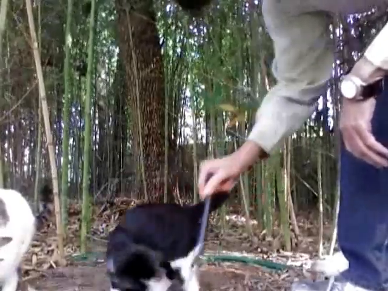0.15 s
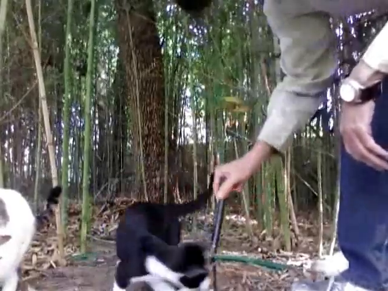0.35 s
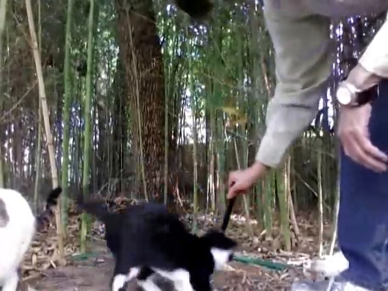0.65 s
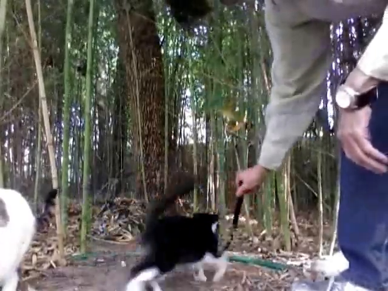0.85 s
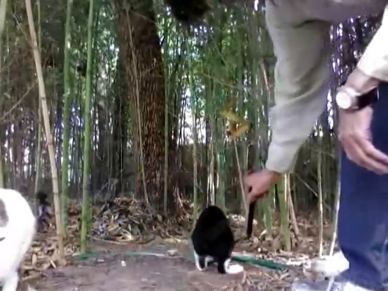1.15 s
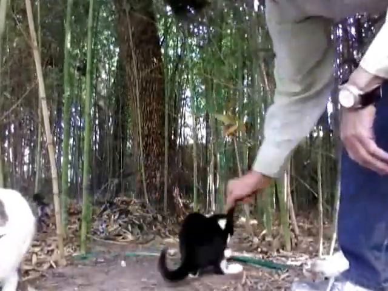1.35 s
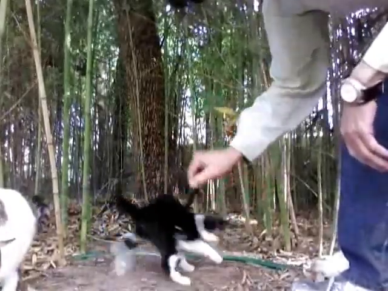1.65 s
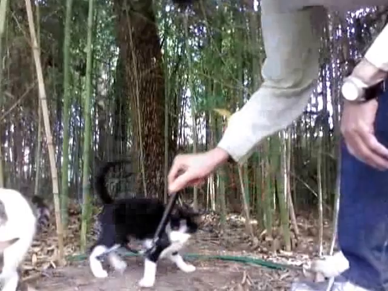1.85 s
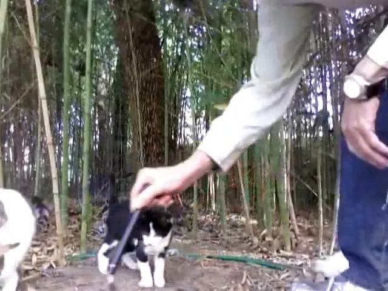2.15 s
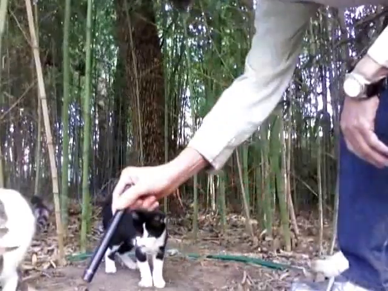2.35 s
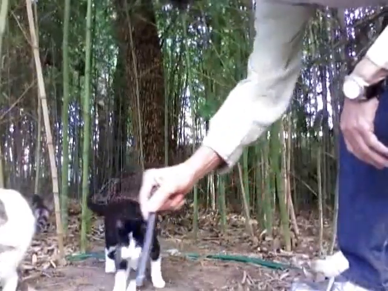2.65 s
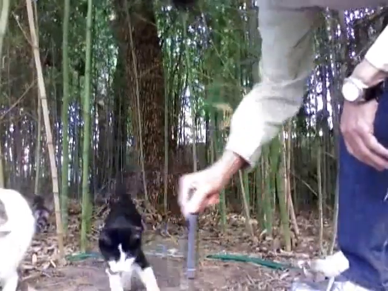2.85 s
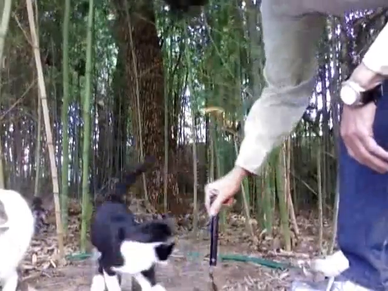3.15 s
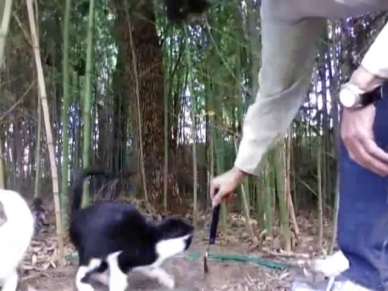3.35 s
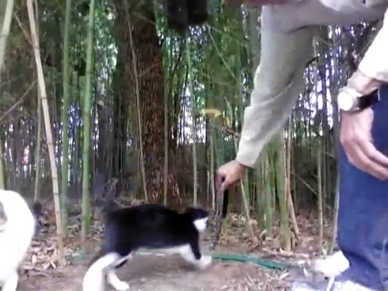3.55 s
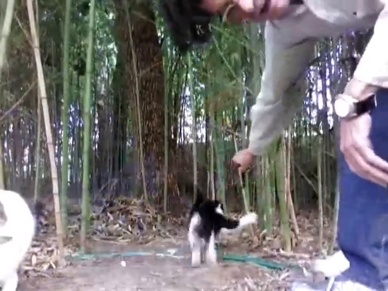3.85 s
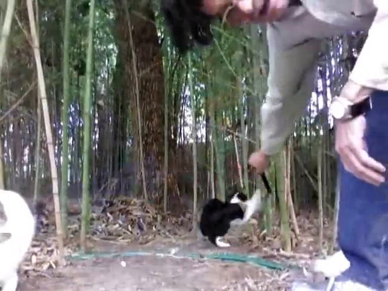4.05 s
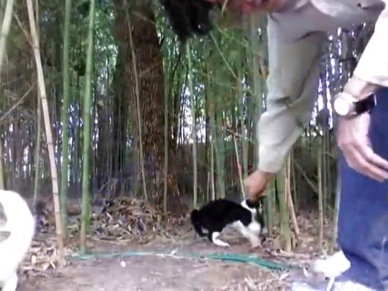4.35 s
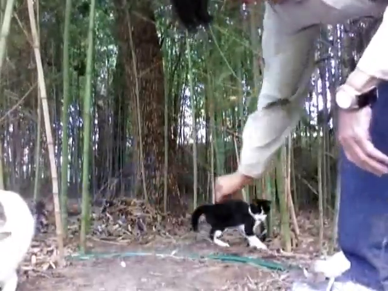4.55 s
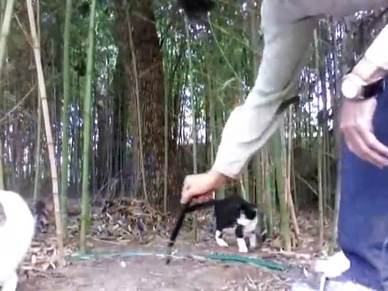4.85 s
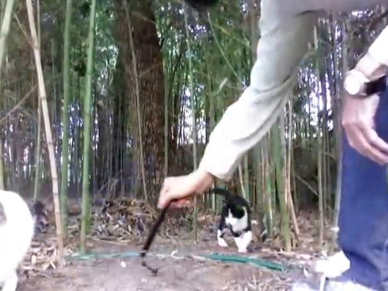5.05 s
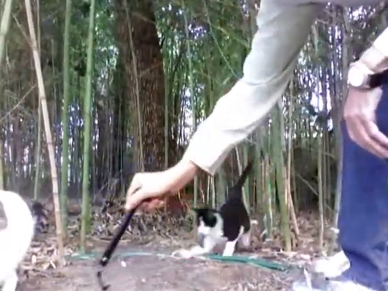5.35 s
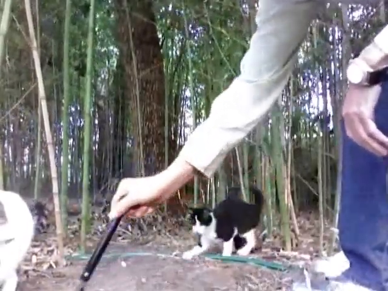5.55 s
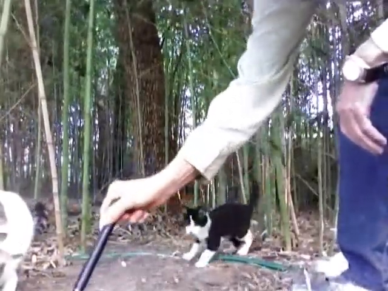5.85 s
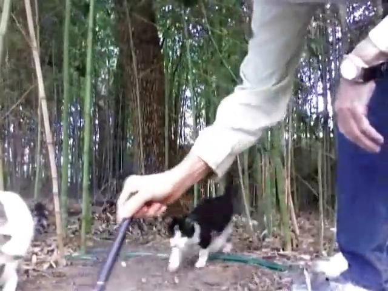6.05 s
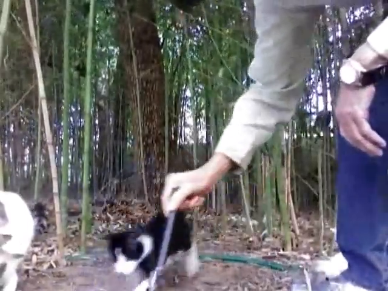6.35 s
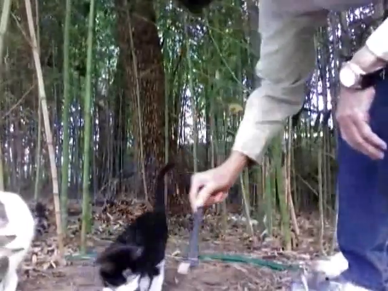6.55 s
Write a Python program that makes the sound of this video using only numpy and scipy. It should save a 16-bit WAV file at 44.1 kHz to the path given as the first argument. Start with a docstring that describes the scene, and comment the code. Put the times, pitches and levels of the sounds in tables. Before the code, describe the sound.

Wind swells through a bamboo grove, rustling leaves and thumping on the microphone, with a few faint snaps of dry litter.

```python
"""A light wind stirs a bamboo grove, and dry litter rustles and snaps under a playing kitten.
Near 2.5 s the wind swells: thousands of leaves brush and tick over a soft rush from deeper in the grove.
A stronger swell peaks near 4.8 s; the leaves thrash, distant trees murmur, and eddies at a small
camera's microphone make a low flutter with a few hard thumps. After 6 s the wind dies down."""
import sys
import numpy as np
from scipy import signal
from scipy.fft import rfft, irfft, next_fast_len
from scipy.io import wavfile
from scipy.ndimage import uniform_filter1d

SR = 44100
rng = np.random.default_rng(int(sys.argv[2]) if len(sys.argv) > 2 else 0)


def put_to_file(sound):
    """Save the sound as 16-bit audio at rate SR, in the file named by the first command-line argument."""
    columns = np.atleast_2d(sound).T  # one column per channel
    safe = np.clip(columns, -1, 1)
    whole_steps = np.round(safe * 32767)
    wavfile.write(sys.argv[1], SR, whole_steps.astype(np.int16))


N = 295911
TIME = np.arange(N) / SR

# Spectrum of the fine turbulence behind an eddy. Each row: frequency in Hz, relative level in dB.
WAKE_SPECTRUM = [(30, -26.5), (120, -11), (230, 5), (330, -5.5), (450, -16.5), (650, -22), (1500, -61.5)]


def near_leaves():
    """Friction and impact: blades slide and tick, and in strong wind their thrashing thickens the hiss."""
    # Spectra of brushing and of thrashing leaves. Each row: frequency in Hz, relative level in dB.
    hiss_spectrum = [(1000, -49), (2500, -19), (3500, -11.5), (4300, -7), (5200, -2), (5900, 1), (6600, -3),
                     (7300, -12), (7800, -22.5), (8400, -29), (8900, -35.5)]
    thrash_spectrum = [(200, -11), (400, -7), (550, -7.5), (800, -15), (1800, -11.5), (2700, 1), (3700, 0),
                       (5000, 0.5), (6500, -11.5), (8900, -51)]
    # Dry leaves stirred close by. Each row: start in seconds, length in seconds, level in dB.
    rustles = [(.405, 0.023, -46), (0.577, 0.16, -52), (.945, .2, -53.5), (1.818, 0.16, -48),
               (2.042, .07, -44), (2.1, 0.03, -52), (2.23, 0.14, -47), (3.248, 0.23, -40),
               (3.587, 0.088, -33.5), (4.05, 0.84, -31), (5.595, 0.049, -32.5), (6.417, 0.036, -47)]
    hiss_db = wind_driven(fresh_db=-35.3, slope=0.99)
    hiss_db = surging(hiss_db, rustles, rise_db_per_s=598.5, fall_db_per_s=180)
    sliding = coloured(rng.standard_normal(N), hiss_spectrum)
    ticks = leaf_ticks(per_s=1300, spread_db=3.5, low_hz=1772, high_hz=8270, decay_cycles=7.8)
    ticking = coloured(ticks, hiss_spectrum)
    thrashing = coloured(rng.standard_normal(N), thrash_spectrum)
    shiver_db = 0.7 * wander(rate_hz=35)
    hiss = unit_rms(sliding + gain_of(-4.5) * ticking) * gain_of(hiss_db + shiver_db)
    return hiss + thrashing * gain_of(wind_driven(fresh_db=-45, slope=1.23))


def leaf_ticks(per_s, spread_db, low_hz, high_hz, decay_cycles, sizes=28):
    """Damped vibration: leaves of many sizes touch at random, a few of them hard, and ring briefly."""
    t = np.arange(SR // 100) / SR
    out = np.zeros(N)
    for hz in np.geomspace(low_hz, high_hz, sizes):
        touches = rng.random(N) < per_s / sizes / SR
        hardness = np.minimum(rng.exponential(1, N), 4)
        age = t * hz / decay_cycles
        ring = age * np.exp(-age) * np.sin(2 * np.pi * (hz * t + rng.random()))
        out += hz * signal.oaconvolve(touches * gain_of(spread_db * hardness), ring)[:N]
    return unit_rms(out)


def buffets():
    """Convected pressure: a large eddy passes the microphone as a thump of sinking pitch with a wake."""
    # Single eddies. Each row: time of the peak in seconds, relative level in dB, pitch in Hz.
    eddies = [(0.122, -26.5, 149), (.161, -24, 145.7), (3.215, -25, 139.7), (3.249, -23, 159),
              (3.418, -21, 116), (4.045, -24, 130.5), (4.488, -16.5, 121), (4.562, -2.5, 150),
              (4.58, -4, 153.1), (4.656, -16.5, 127), (4.829, -14, 143), (5.185, 0, 151.3),
              (5.353, -9, 139.8), (5.44, -18, 125), (5.499, -12.5, 134.5), (5.877, -14.5, 152),
              (5.965, -11, 242), (5.976, -8.5, 134), (5.996, -15, 176.4), (6.035, -18, 141.3)]
    out = np.zeros(N)
    wake = coloured(rng.standard_normal(N), WAKE_SPECTRUM)
    for peak_s, db, hz in eddies:
        length_s = 0.0071 * (150 / hz) ** 2.2  # quick eddies are shorter
        near = abs(TIME - peak_s) < 0.06
        age = (TIME[near] - peak_s) / length_s
        turns = np.cumsum(hz * (1 - 0.2 * np.tanh(age))) / SR
        swing = np.sin(2 * np.pi * (turns + rng.random())) / np.cosh(1.75 * age)
        roughness = gain_of(-17) * (hz / 150) ** 2 / np.cosh(0.67 * (age - 0.4))  # and rougher
        out[near] += gain_of(db) * (swing + roughness * wake[near])
    return out


def flutter():
    """Turbulent cascade: small eddies hit the microphone in lumps; faster air breaks them up finer."""
    # Spectrum of the pressure at the microphone port. Each row: frequency in Hz, relative level in dB.
    flutter_spectrum = [(15, -57.5), (30, -44.5), (50, -24.5), (80, -19.5), (105, -4.5), (128, 5),
                        (160, 0.5), (185, -4), (222, -9.5), (300, -18), (420, -34.5), (650, -33.5),
                        (1500, -79.5)]
    # Puffs of air at the port. Each row: start in seconds, length in seconds, relative level in dB.
    puffs = [(0.123, 0.054, -43.5), (0.633, 0.016, -51.5), (0.747, 0.04, -50.5), (0.882, .025, -53),
             (1.255, .03, -53.5), (1.624, 0.016, -56), (1.861, 0.021, -45), (2.107, 0.02, -50),
             (2.4, 0.064, -50), (2.56, 0.28, -41), (2.938, 0.537, -37), (3.201, 0.089, -29),
             (3.55, .5, -43.5), (3.767, 0.043, -35), (4.308, 0.64, -41), (4.469, 0.16, -29),
             (4.762, .22, -34), (5.081, 0.21, -32), (5.275, .22, -30.5), (5.756, 0.33, -35),
             (6.456, .09, -36)]
    coarse = coloured(rng.standard_normal(N), flutter_spectrum)
    coarse /= np.sqrt(uniform_filter1d(coarse ** 2, size=1600) + 1e-6)  # the draught sets the slow level
    swirl = wander(rate_hz=25)
    lumps_db = np.where(swirl > 0, 2.4, 5.0) * swirl  # low crests, deep gaps
    draught_db = wind_driven(fresh_db=-61.5, slope=0.79)
    draught_db = surging(draught_db, puffs, rise_db_per_s=518, fall_db_per_s=277.5) + lumps_db
    fine = coloured(rng.standard_normal(N), WAKE_SPECTRUM) * gain_of(1.225 * draught_db - 7)
    return coarse * gain_of(draught_db - 0.5) + fine


def litter():
    """Brittle fracture: each snap is a noise burst that excites a resonance of the leaf or twig."""
    # Dry leaves and twigs breaking. Each row: start in seconds, relative peak level in dB, pitch in Hz.
    snaps = [(0.037, -29.5, 5830), (0.944, -38, 5560), (1.835, -35.5, 6040), (2.2308, -30, 5730),
             (5.359, -24, 5150)]
    t = np.arange(SR // 20) / SR
    envelope = (1 - np.exp(-t / 0.0022)) * (np.exp(-t / 0.0044) + 0.076 * np.exp(-t / 0.012))
    treble_band = signal.butter(4, [3500, 7000], "band", fs=SR, output="sos")
    out = np.zeros(N)
    for start_s, db, hz in snaps:
        burst = rng.standard_normal(len(t)) * envelope
        ring = signal.lfilter(*signal.iirpeak(hz, Q=4.5, fs=SR), burst)
        crunch = signal.sosfilt(treble_band, ring)
        span = out[round(start_s * SR):][:len(t)]
        span += (gain_of(db + 5.5) * crunch / abs(crunch).max())[:len(span)]
    return out


def dull_rustle():
    """Incoherent summation: leaves moved by wind or the kitten merge into a dull rush and soft patter."""
    # Spectrum of the rush, combed by the ground echo. Each row: frequency in Hz, relative level in dB.
    rush_spectrum = [(100, -15.5), (300, -4), (500, -17), (640, -5.5), (780, 2), (900, -1), (1100, 2),
                     (1320, 0), (1620, 3.5), (2100, -1), (3300, -9), (5000, -20), (7000, -25),
                     (8900, -57.5)]
    # Brief swells of dull rustling: the kitten scuffing in dry litter, and leaves shaken by wind.
    # Each row: start in seconds, length in seconds, level in dB.
    swells = [(.22, .11, -52.5), (1.046, .13, -58.5), (1.842, 0.056, -51), (2.088, 0.024, -52),
              (2.255, 0.41, -49.5), (3.856, 0.14, -40), (4.78, 0.09, -37), (5.984, 0.03, -40)]
    sprays = shaking_sprays(rng.standard_normal(N), depth_db=2.2, patch_s=0.03, patch_hz=250)
    patter = leaf_ticks(per_s=900, spread_db=2.6, low_hz=700, high_hz=5000, decay_cycles=1.8)
    sway_db = 1.1 * wander(rate_hz=25)
    rush = coloured(sprays, rush_spectrum) + gain_of(-1.5) * coloured(patter, rush_spectrum)
    rush_db = wind_driven(fresh_db=-44.5, slope=0.82, lag_s=0.058)  # gusts reach the deep grove later
    rush_db = surging(rush_db, swells, rise_db_per_s=348, fall_db_per_s=223.5)
    return unit_rms(rush) * gain_of(rush_db + sway_db)


def distant_trees():
    """Flow noise: wind in far trees makes a low murmur that comes and goes slowly."""
    # Course of the murmur. Each row: time in seconds, level in dB.
    murmur_levels = [(0, -65), (1.0, -71.5), (1.6, -69), (2.4, -76), (3.4, -74.5), (4.4, -49), (5.2, -48),
                     (6.1, -56), (6.71, -55.5)]
    # Spectrum of the murmur. Each row: frequency in Hz, relative level in dB.
    murmur_spectrum = [(30, -42), (70, -18.5), (125, -5.5), (300, -11), (520, -5.5), (680, 2), (785, 4.5),
                       (900, -2), (1100, -5), (1500, -6), (2500, -18), (6000, -18), (8900, -45.5)]
    return gain_of(follow(murmur_levels)) * coloured(rng.standard_normal(N), murmur_spectrum)


def stem_echoes(x, count=140, decay_s=0.025):
    """Scattering: hard stems add many faint early echoes, while the bass diffracts round them."""
    delays_s = rng.uniform(0.002, 0.06, count)
    taps = np.zeros(SR // 10)
    taps[(delays_s * SR).astype(int)] = rng.choice([-1, 1], count) * np.exp(-delays_s / decay_s)
    echoes = signal.oaconvolve(x, taps / np.linalg.norm(taps))[:N]
    highpass = signal.butter(2, 1500, "high", fs=SR, output="sos")
    return x + gain_of(-14) * signal.sosfilt(highpass, echoes)


def shaking_sprays(x, depth_db, patch_s, patch_hz):
    """Random modulation: x flares in small patches of time and pitch as single sprays of leaves shake."""
    size, hop = 512, 128
    spectra = signal.stft(x, nperseg=size, noverlap=size - hop)[2]
    frames, bins = patch_s * SR / hop, patch_hz * size / SR
    field = rng.standard_normal(spectra.shape)
    field = signal.lfilter([1], [1, -np.exp(-1 / frames)], field, axis=1)
    field = signal.lfilter([1], [1, -np.exp(-1 / bins)], field, axis=0)
    flared = spectra * gain_of(depth_db * unit_rms(field))
    return signal.istft(flared, nperseg=size, noverlap=size - hop)[1][:N]


def wind_driven(fresh_db, slope, lag_s=0):
    """Power law: a level is fresh_db in a fresh wind and gains slope dB for each dB of gust."""
    # Strength of the wind in the crowns. Each row: time in seconds, level in dB.
    gusts = [(0.07, -52.5), (0.48, -51.5), (0.79, -56), (0.92, -55), (1.6, -63), (2.47, -39.5), (2.95, -42),
             (3.07, -46), (3.38, -40), (3.55, -45.5), (3.58, -38.5), (4.82, -33.5), (5.71, -40.5),
             (5.76, -45.5), (6.02, -40.5), (6.39, -53.5), (6.47, -48.5), (6.71, -56)]
    fresh_wind_db = -42
    wind_db = np.interp(TIME - lag_s, TIME, follow(gusts))
    return fresh_db + slope * (wind_db - fresh_wind_db)


def surging(base_db, surges, rise_db_per_s, fall_db_per_s):
    """Addition of powers: the level in dB of a base plus surges that each rise, hold and die away."""
    power = gain_of(base_db) ** 2
    for start_s, length_s, db in surges:
        before_s = np.maximum(start_s - TIME, 0)
        after_s = np.maximum(TIME - start_s - length_s, 0)
        power += gain_of(db - rise_db_per_s * before_s - fall_db_per_s * after_s) ** 2
    return 10 * np.log10(power)


def coloured(x, spectrum):
    """Linear filtering: x is weighted by a spectrum and scaled to an rms of 1."""
    hz, db = np.transpose(spectrum)
    size = next_fast_len(N)
    bin_hz = np.fft.rfftfreq(size, 1 / SR)
    response = gain_of(np.interp(np.log(bin_hz + 1), np.log(hz), db))
    return unit_rms(irfft(rfft(x, size) * response, size)[:N])


def wander(rate_hz):
    """Low-pass noise: a smooth random drift of rms 1, mostly slower than rate_hz."""
    size = next_fast_len(N)
    bin_hz = np.fft.rfftfreq(size, 1 / SR)
    white = rfft(rng.standard_normal(size))
    return unit_rms(irfft(white / (1 + (bin_hz / rate_hz) ** 2), size)[:N])


def follow(curve):
    """Linear interpolation: the value of a curve at every sample."""
    return np.interp(TIME, *np.transpose(curve))


def unit_rms(x):
    """Normalisation: x at an rms of 1."""
    return x / np.sqrt(np.mean(x ** 2) + 1e-20)


def gain_of(db):
    """Decibel scale: the amplitude ratio for a level."""
    return 10 ** (np.asarray(db) / 20)


def scene():
    """Superposition: foliage, snaps on the ground and wind on the microphone add in one channel."""
    foliage = near_leaves() + dull_rustle() + distant_trees()
    foliage = shaking_sprays(foliage, depth_db=2.5, patch_s=0.024, patch_hz=330)
    grove = stem_echoes(foliage + litter())
    return (grove + flutter() + gain_of(-4) * buffets())[None]


def record(dry):
    """Band limiting: the camera cuts the deepest bass, a narrow treble notch and all above a steep edge."""
    bass_hz, notch_hz, edge_hz = 32, 8010, 9030
    bass_cut = signal.sosfilt(signal.butter(2, bass_hz, "high", fs=SR, output="sos"), dry)
    taps = signal.firwin(1201, [notch_hz - 170, notch_hz + 170, edge_hz], window=("kaiser", 8), fs=SR)
    return signal.oaconvolve(bass_cut, taps[None], "same")


dry = scene()
out = record(dry)
put_to_file(out)
```